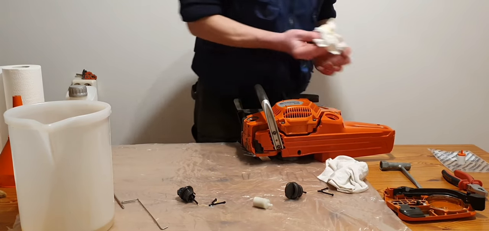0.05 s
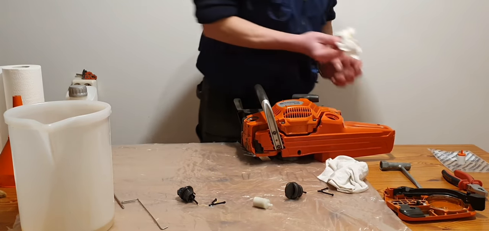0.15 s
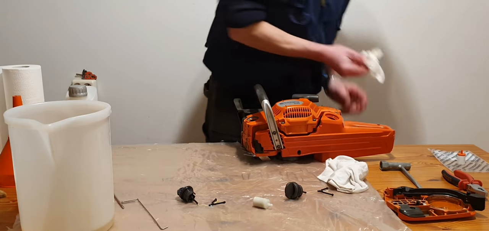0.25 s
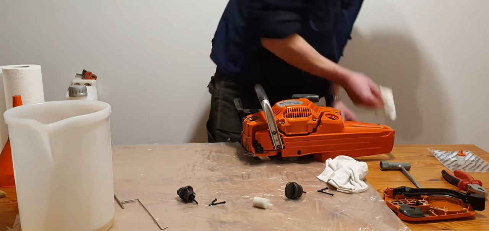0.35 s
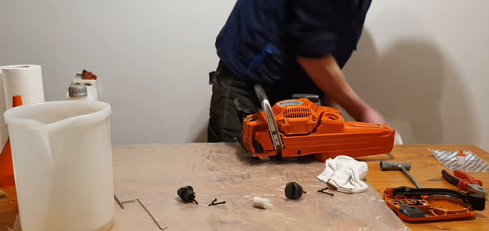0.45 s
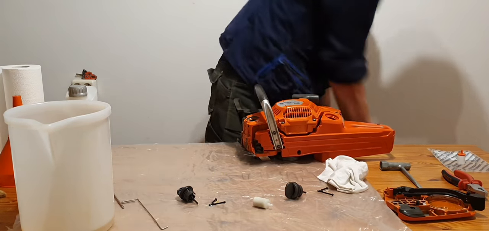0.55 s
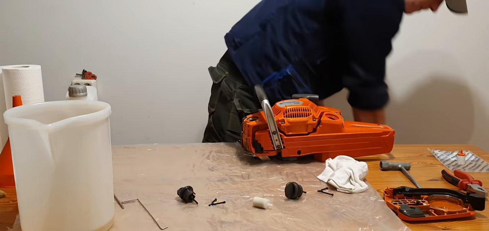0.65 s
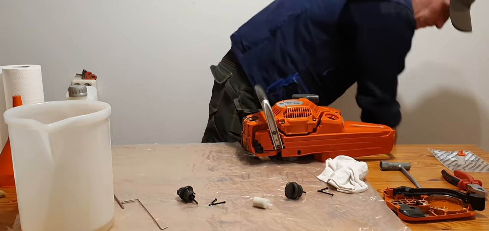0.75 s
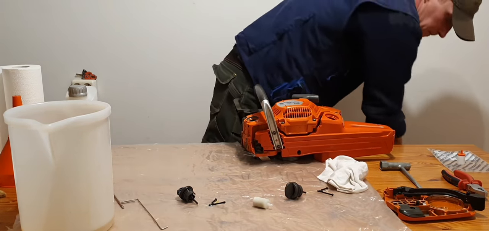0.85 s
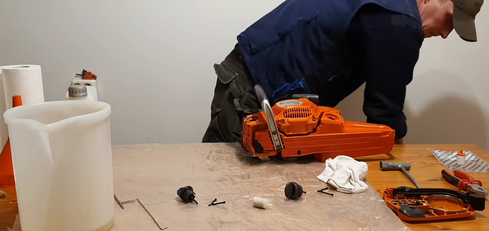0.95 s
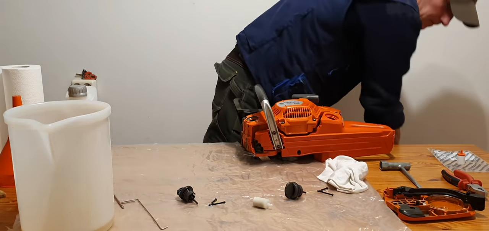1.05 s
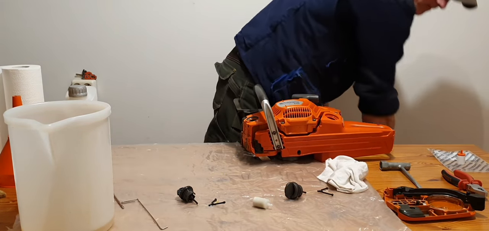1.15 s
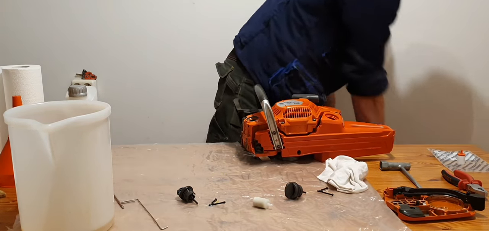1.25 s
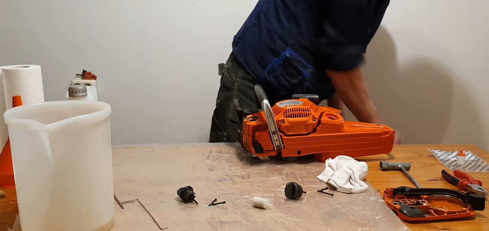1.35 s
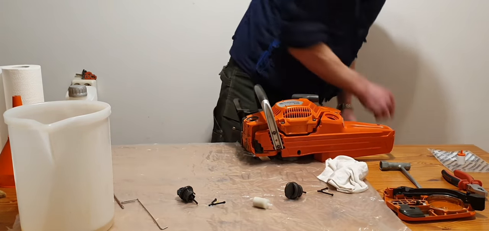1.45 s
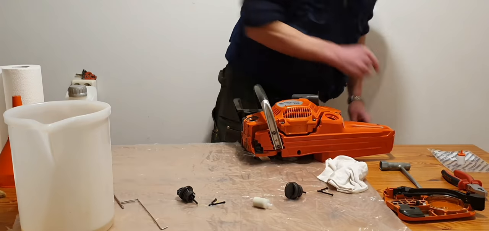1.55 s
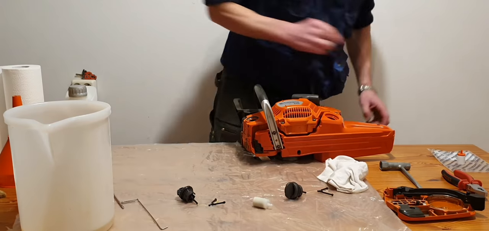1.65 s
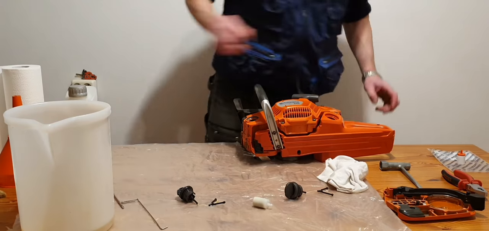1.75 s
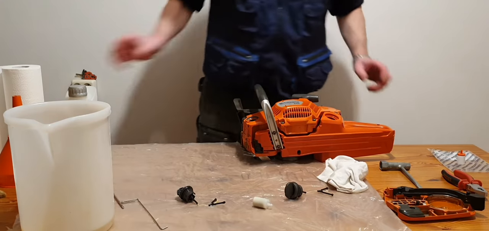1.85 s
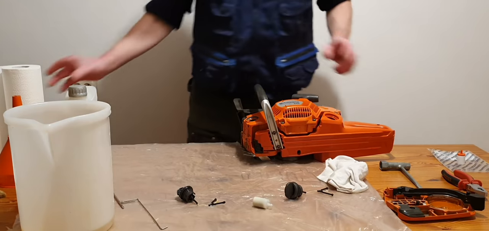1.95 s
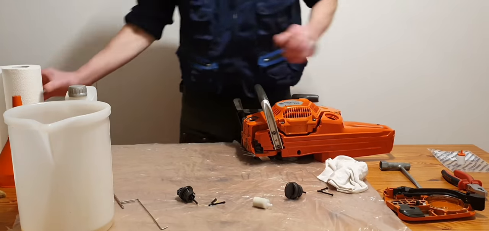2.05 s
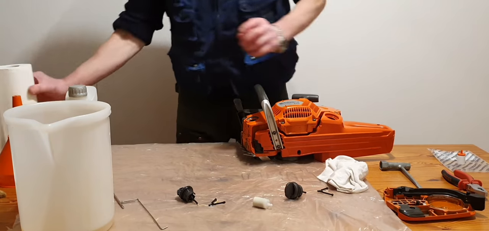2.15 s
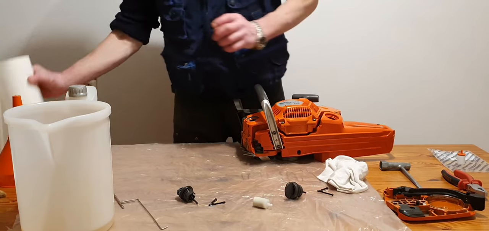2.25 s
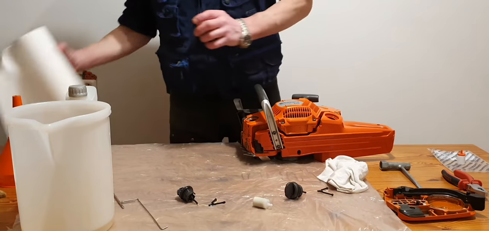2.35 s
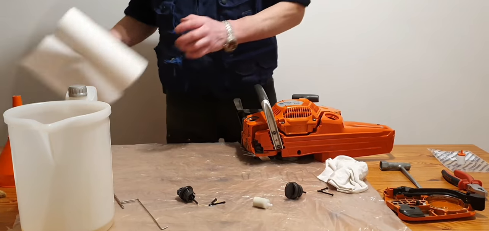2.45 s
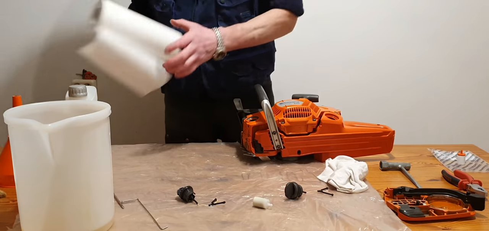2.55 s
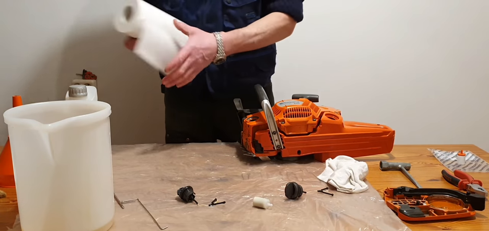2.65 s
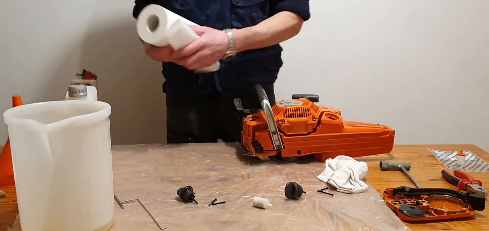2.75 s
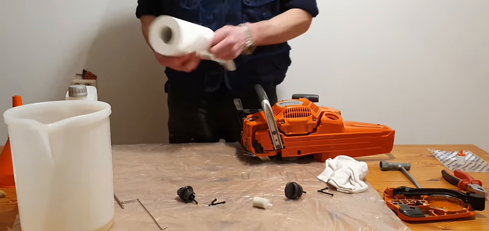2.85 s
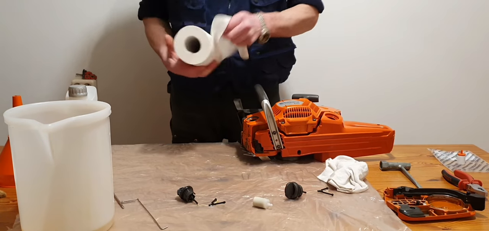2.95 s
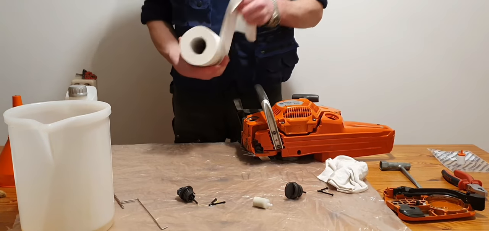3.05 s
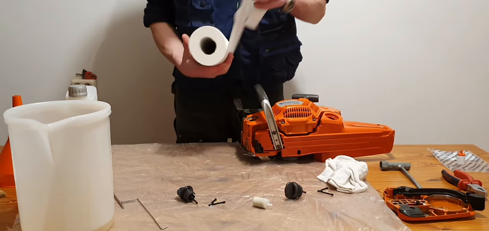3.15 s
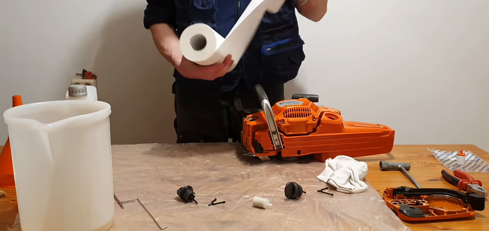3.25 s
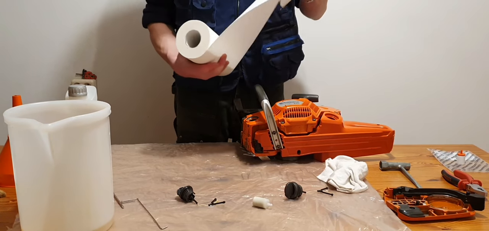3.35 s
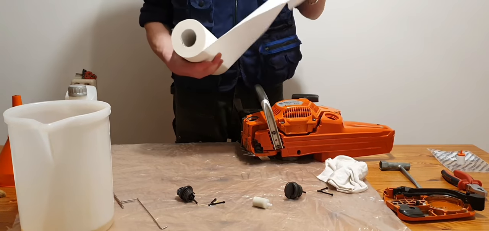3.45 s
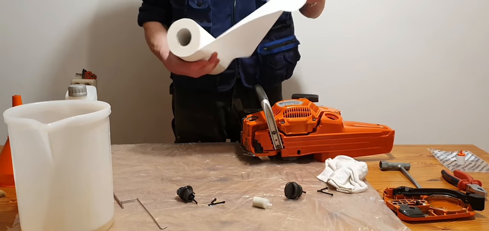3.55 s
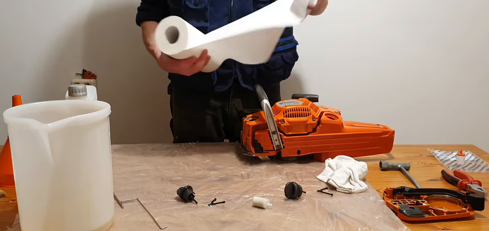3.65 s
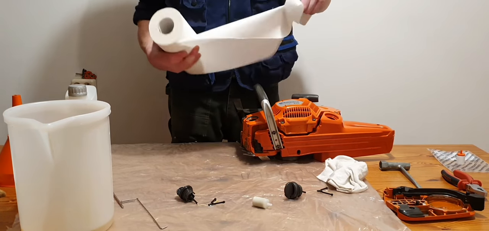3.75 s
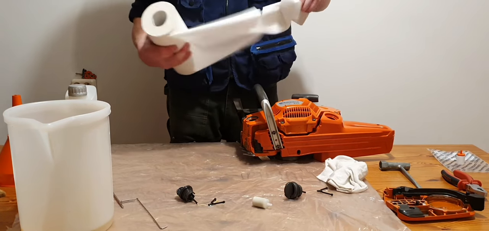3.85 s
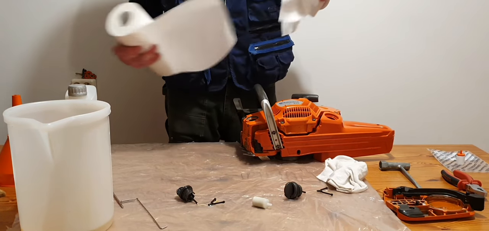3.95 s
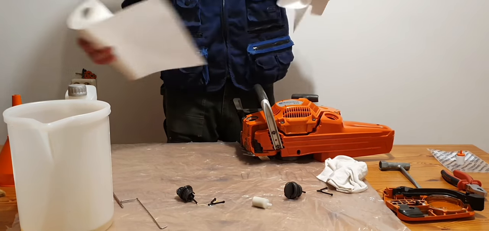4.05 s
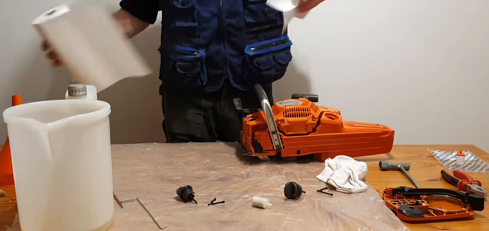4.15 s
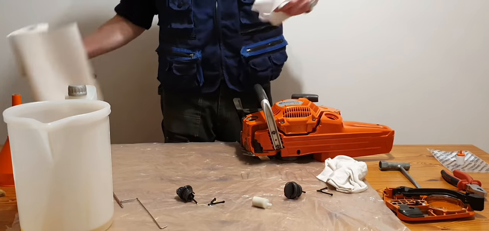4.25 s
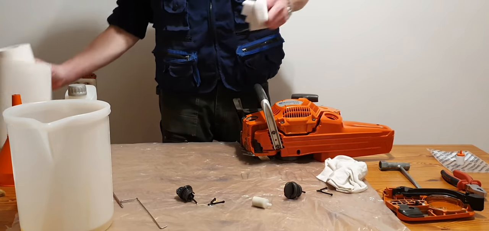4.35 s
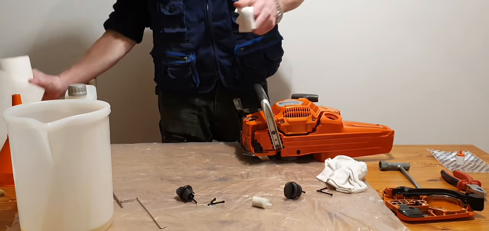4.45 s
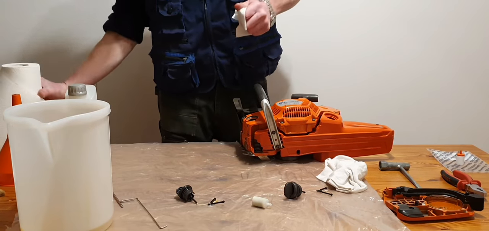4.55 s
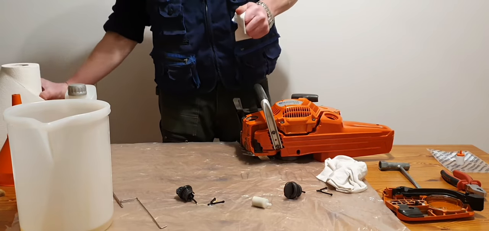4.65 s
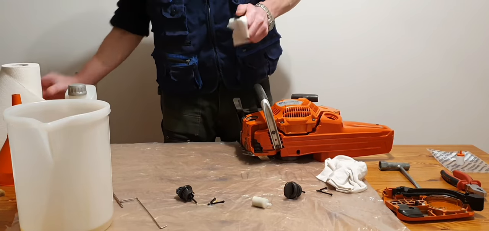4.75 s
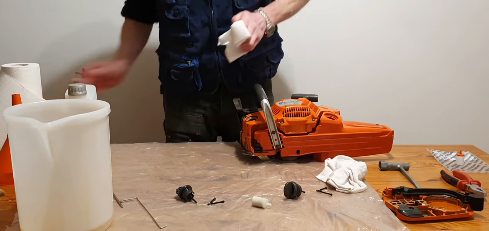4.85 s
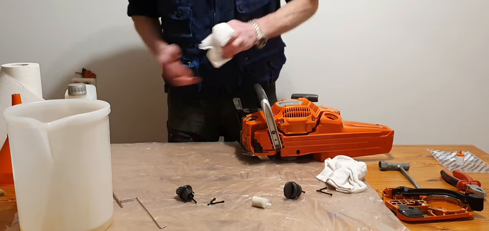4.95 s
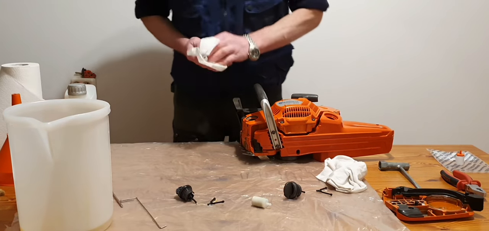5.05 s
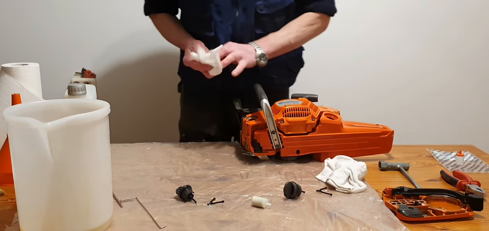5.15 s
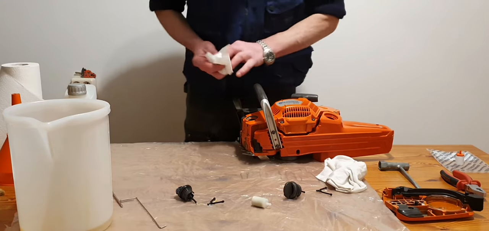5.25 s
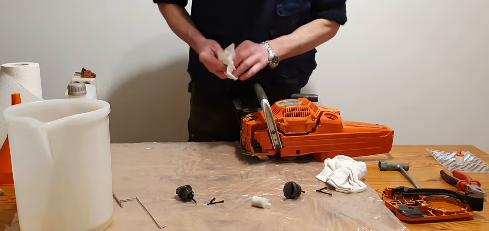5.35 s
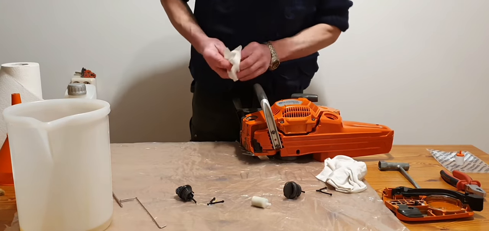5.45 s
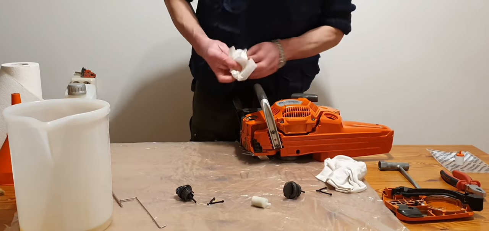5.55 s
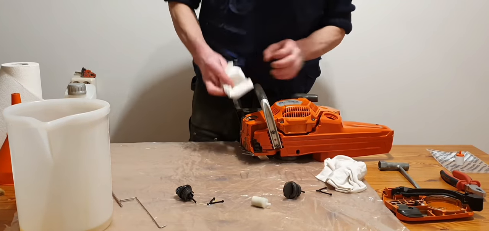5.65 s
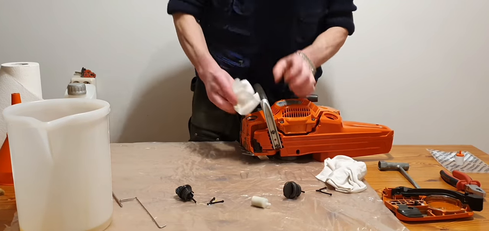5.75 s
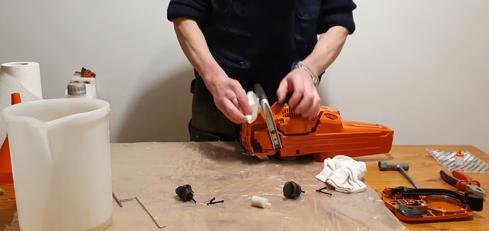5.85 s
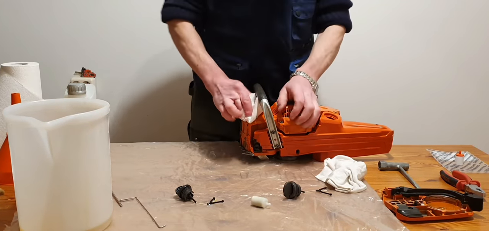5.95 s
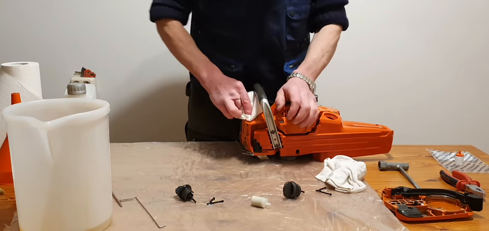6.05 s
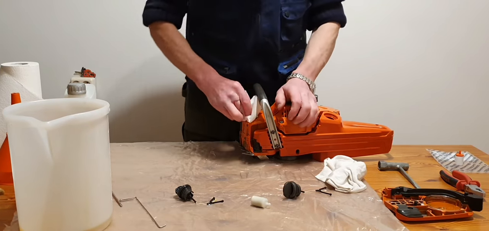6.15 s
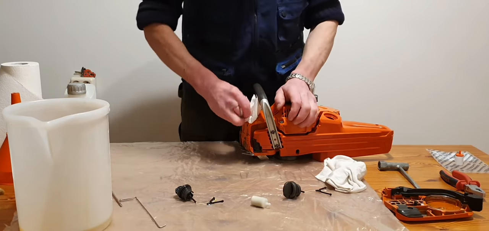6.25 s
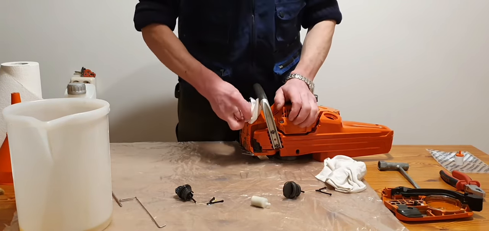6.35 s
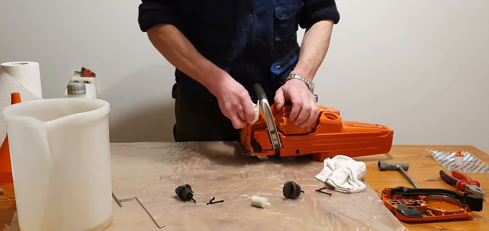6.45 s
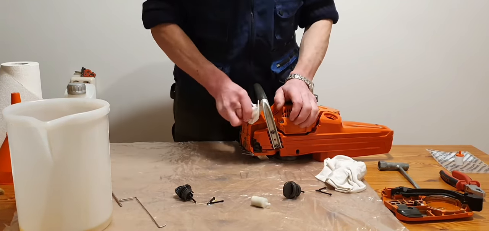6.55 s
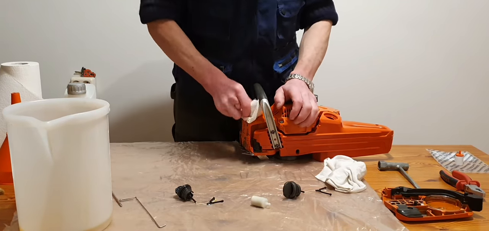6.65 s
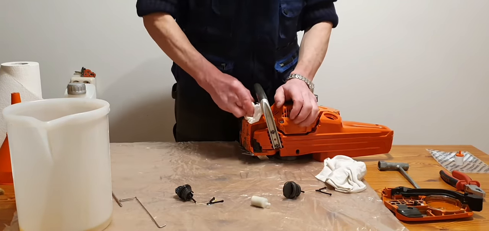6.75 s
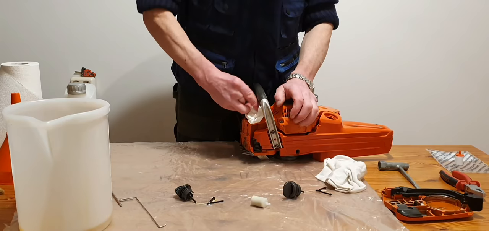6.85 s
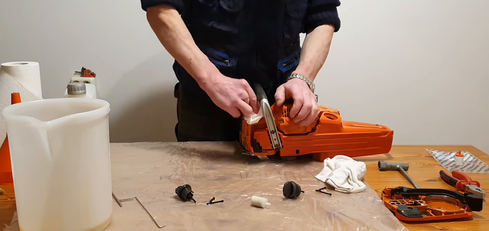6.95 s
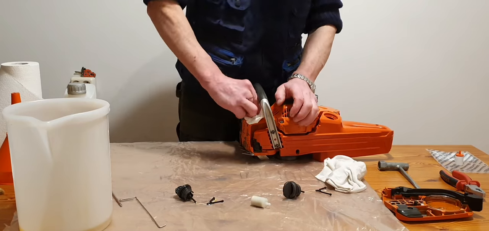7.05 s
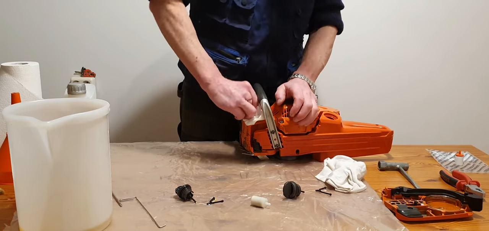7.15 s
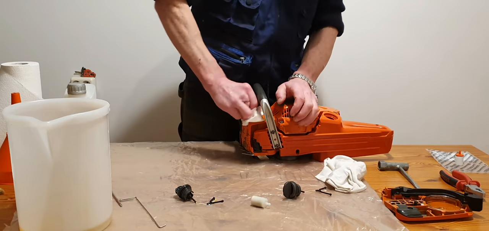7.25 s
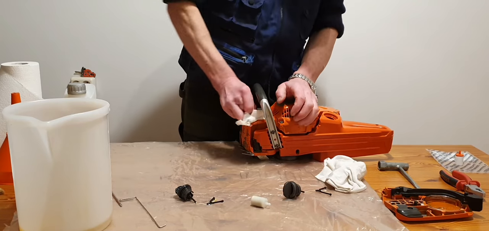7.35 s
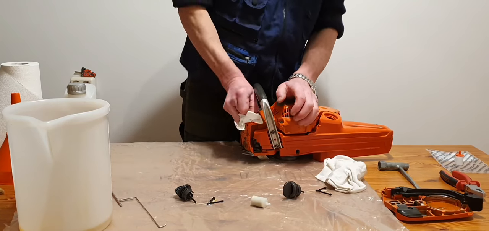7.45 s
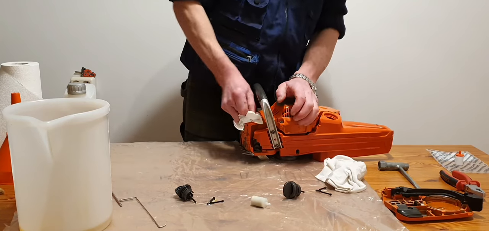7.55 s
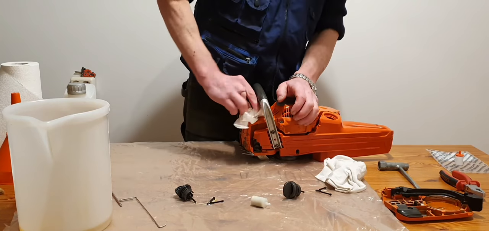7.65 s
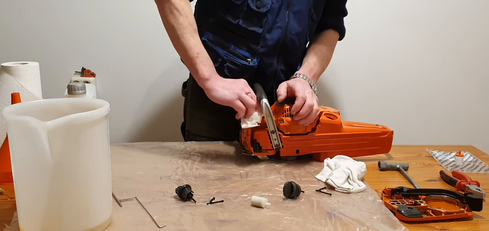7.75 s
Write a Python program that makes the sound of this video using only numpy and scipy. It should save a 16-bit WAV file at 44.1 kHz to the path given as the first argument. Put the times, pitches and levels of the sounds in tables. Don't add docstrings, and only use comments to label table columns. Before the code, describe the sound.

A small bare room with hard walls, echoes lasting about a third of a second, and faint low microphone hiss. From 0 to 2.2 s there is only quiet jacket rustling, soft low weight shifts and a very faint high nylon whistle around 1.1 to 1.6 s. At about 2.2 to 2.8 s a hollow paper roll is taken, with small knocks and growing papery crackle. From 2.8 to 3.7 s it is unrolled, swishing and creasing, with a faint hollow rub. At 3.79 s a sheet snaps off: an abrupt, bright rip of about a tenth of a second. Paper flutters until 4.49 s, when the roll lands with a deep, resonant table thump and small ticks. From 4.8 to 5.8 s the sheet is crumpled crisply, strongest near 5.13 s. Then soft dry wiping continues, with dull bumps near 7.3 s and light casing taps at 7.66 s. The right side is louder and brighter.

```python
import sys
import numpy as np
from scipy import signal
from scipy.fft import rfft, irfft, next_fast_len
from scipy.io import wavfile
from scipy.ndimage import uniform_filter1d

SR = 44100
rng = np.random.default_rng(int(sys.argv[2]) if len(sys.argv) > 2 else 0)


def attenuation_scalar(level_db):
    decades = np.asarray(level_db, float) / 20
    return 10 ** decades


def bounce(signal):
    frames = np.transpose(np.atleast_2d(signal))
    limited = np.clip(frames, -1, 1)
    pcm = np.round(limited * 32767).astype(np.int16)
    wavfile.write(sys.argv[1], SR, pcm)


N = 344421
FFT_SIZE = next_fast_len(N, True)
HZ, TIME = np.fft.rfftfreq(FFT_SIZE, 1 / SR), np.arange(N) / SR


def evened(x):
    return x / np.sqrt(np.mean(x ** 2) + 1e-20)


def read(points, hz):
    f, value = np.transpose(points)
    return np.interp(np.log(hz + 1), np.log(f + 1), value)


def filtered(x, gain):
    return irfft(rfft(x, FFT_SIZE) * gain, FFT_SIZE)[..., :N]


def coloured(x, points):
    hz = abs(np.fft.fftfreq(4096, 1 / SR))
    log_gain = np.log(attenuation_scalar(read(points, hz).clip(-100)))
    taps = np.fft.ifft(np.exp(signal.hilbert(log_gain).conj())).real
    return signal.oaconvolve(x, np.atleast_2d(taps[:2048]), axes=1)[:, :x.shape[1]]


def unit_colour(x, points):
    return coloured(x, points) / np.linalg.norm(coloured(signal.unit_impulse(2048)[None], points))


def placed(start_s, x):
    return np.pad(x, ((0, 0), (round(start_s * SR), N)))[:, :N]


def snaps(per_s, spread_db, hiss, count=N):
    size_db = spread_db * np.minimum(rng.exponential(1, count), 4)
    size = attenuation_scalar(size_db) * rng.choice([-1, 1], count)
    clicks = size * (rng.random(count) < per_s / SR)
    return evened(clicks) + hiss * rng.standard_normal(count)


def swells(rows, t):
    slope_db, rounded = 10, 1.75
    s, db, rise, fall = np.transpose(rows)[:4, :, None]
    away = np.maximum((s - t) / rise, (t - s) / fall)
    return attenuation_scalar(2 * (db - slope_db * away ** rounded).clip(-200))


def swell(rows):
    coarse = TIME[::64]
    return np.interp(TIME, coarse, np.sqrt(swells(rows, coarse).sum(0)))


# f/Hz, likeness [0..1]
LIKENESS = [(60, 0.66), (180, 0.78), (550, 0.44), (1650, 0.099), (4970, 0.082), (15000, 0.012)]


def paired(z, hz):
    same = np.clip(read(LIKENESS, hz), -1, 1)
    return np.array([z[0], same * z[0] + np.sqrt(1 - same ** 2) * z[1]])


def at_ports(a, b):
    spectra = rfft(np.array([a, b]), FFT_SIZE)
    return irfft(paired(spectra, HZ), FFT_SIZE)[:, :N]


# f/Hz, t60/s
WALLS_T60 = [(60, 0.23), (250, 0.31), (1000, 0.35), (4000, 0.35), (12000, 0.16)]


def room(x, wet_db, faster=1.0):
    taps = np.zeros((2, SR // 2 + 170))
    slots = np.arange(130, SR // 2, 20)
    at = slots + rng.integers(0, 20, (2, len(slots)))
    np.put_along_axis(taps, at, rng.choice([-1., 1.], at.shape), 1)
    hz, t, z = signal.stft(taps, SR, nperseg=512)
    decay = attenuation_scalar(-60 * faster * t / read(WALLS_T60, hz)[:, None])
    tail = signal.istft(paired(z, hz[:, None]) * decay, SR, nperseg=512)[1]
    tail *= attenuation_scalar(wet_db) / np.linalg.norm(tail, axis=1, keepdims=True)
    wet = signal.oaconvolve(x[None], tail, axes=1)[:, :len(x)]
    return (x + wet) / np.sqrt(1 + attenuation_scalar(2 * wet_db))


def scattered(power, faster=0.67):
    count = len(power)
    hz, t, z = signal.stft(rng.standard_normal((2, count)), SR, nperseg=256)
    frames = np.interp(t - .006, TIME[:count], uniform_filter1d(power, size=128))
    keep = attenuation_scalar(-120 * faster * t[1] / read(WALLS_T60, hz))
    stored = np.array([signal.lfilter([1 - k], [1, -k], frames) for k in keep])
    return signal.istft(paired(z, hz[:, None]) * np.sqrt(abs(stored)), SR, nperseg=256)[1][:, :count]


# t/s, effort/dB, rise/s, fall/s, weight/dB
JACKET_GESTURES = [(0.04, -71.5, 0.33, 0.078, -27), (0.2, -83, 0.31, 0.13, 16.5),
                   (0.34, -73, 0.04, 0.4, -40), (0.45, -94, 0.18, 0.19, 31), (0.62, -74, 0.42, 0.25, -31),
                   (0.73, -65, 0.077, 0.13, -13), (0.859, -65.5, 0.17, 0.059, 11.5),
                   (1.03, -67, 0.14, 0.11, 9), (1.25, -80, 0.099, 0.17, -11), (1.47, -94.5, 0.13, 0.22, 33),
                   (1.55, -89, .08, 0.086, 26), (1.65, -79.5, 0.26, 0.14, -20),
                   (1.85, -81, 0.073, 0.11, -7), (2.0, -69.5, 0.051, 0.17, -17),
                   (2.11, -66, 0.049, 0.19, -4), (2.17, -70.5, 0.063, 0.11, 9.5),
                   (2.38, -67.5, 0.16, 0.16, -5), (4.09, -61.5, 0.069, 0.095, -12),
                   (4.71, -61.5, 0.059, 0.24, 6), (5.55, -71, 0.16, 0.4, -11)]
ROLL_GESTURES = [(2.372, -67, 0.061, 0.13, 15.5), (2.49, -58.5, 0.083, 0.082, -7),
                 (2.57, -68, 0.051, 0.053, 13.5), (2.65, -70.5, 0.075, .05, 3),
                 (2.72, -63, 0.045, 0.082, 9), (2.775, -59.5, 0.042, 0.088, 4),
                 (2.836, -48, 0.045, 0.066, 2.5), (2.97, -51.5, 0.12, 0.075, 6.5),
                 (3.05, -54, 0.05, 0.058, 2.5), (3.13, -55.5, 0.096, 0.1, 0.5),
                 (3.27, -51.5, 0.1, 0.42, -4), (3.36, -56.5, 0.075, 0.51, 6), (3.455, -53, .08, 0.039, -3),
                 (3.52, -77, .04, 0.03, -12), (3.665, -61, 0.045, 0.1, -5), (3.72, -59.5, 0.1, 0.063, 13.5),
                 (3.76, -63, 0.028, 0.038, -40), (4.059, -60.5, 0.43, 0.16, -12),
                 (4.19, -50.5, 0.14, 0.16, -1.5), (4.358, -53, 0.16, 0.045, -7.5),
                 (4.46, -53, 0.063, 0.31, -8), (4.5, -54, 0.021, 0.095, 15.5),
                 (4.59, -66, 0.058, 0.056, 16)]
SHEET_GESTURES = [(4.8, -66.5, 0.046, 0.055, -4), (4.92, -60, 0.057, 0.055, -15),
                  (5.0, -55.5, 0.022, 0.06, 9), (5.08, -51, 0.099, 0.038, -3),
                  (5.128, -47.5, 0.049, 0.037, -6), (5.17, -47.5, 0.035, 0.043, -3.5),
                  (5.215, -56.5, 0.033, 0.023, -4), (5.3, -54.5, 0.31, 0.087, -2),
                  (5.39, -57.5, 0.05, 0.056, -3), (5.53, -54, 0.069, 0.092, -9),
                  (5.69, -55, 0.09, 0.096, -5.5), (5.83, -51.5, 0.032, 0.1, -24),
                  (5.87, -59, 0.11, 0.036, 13.5), (5.97, -56, 0.072, 0.19, 2), (6.14, -62, 0.03, 0.054, -7),
                  (6.18, -64, 0.23, 0.12, 12), (6.28, -59, 0.075, 0.066, -38),
                  (6.39, -59, 0.056, 0.089, 1.5), (6.54, -57.5, 0.13, 0.06, -17),
                  (6.62, -55.5, 0.042, 0.19, -3), (6.79, -57, 0.061, 0.091, 2),
                  (6.895, -54.5, 0.033, 0.062, 4.5), (7.02, -66.5, 0.095, 0.07, 3),
                  (7.11, -60.5, 0.043, 0.12, -0.5), (7.2, -62.5, 0.033, 0.25, 0),
                  (7.341, -59, 0.1, 0.075, 9.5), (7.58, -59.5, 0.081, 0.098, 1.5),
                  (7.665, -62.5, 0.085, 0.067, 16), (7.78, -61, 0.12, .2, 3)]
SKID_GESTURES = [(2.83, -58.5, .03, 0.06, 0), (2.93, -64.5, .05, 0.11, 0), (3.625, -65, .03, 0.044, 0),
                 (4.33, -66, 0.042, .04, -10), (4.41, -67, 0.042, .04, 5), (5.13, -62, .04, .04, 4),
                 (5.535, -62, 0.041, 0.034, 5), (5.69, -64.5, 0.042, 0.052, 1),
                 (5.82, -62.5, 0.029, .04, 0), (6.53, -71, .04, .04, 0), (7.55, -77, .04, .05, 3)]
# body/dB, fold/dB, middle/dB, sheen/dB
REGION_LEVELS_DB = [(-9, -7.5, -0.3, -1), (-7.5, -4.5, -0.5, -8.5), (-14.5, -5.5, 0, -9.5),
                    (-30, -20, -4, 5)]
# body [dB/dB], fold [dB/dB], middle [dB/dB], sheen [dB/dB]
REGION_DB_PER_WEIGHT_DB = [(1, 0.42, 0.02, -0.31), (1, 0.4, 0.085, -0.37), (1, 0.25, 0.0043, 0.11),
                           (1, 1, 1, 0)]


def grips(t):
    power = 0
    gestures = JACKET_GESTURES, ROLL_GESTURES, SHEET_GESTURES, SKID_GESTURES
    for rows, base_db, law in zip(gestures, REGION_LEVELS_DB, REGION_DB_PER_WEIGHT_DB):
        weight_db = np.transpose(rows)[-1]
        colour_db = np.array(base_db)[:, None] + np.outer(law, weight_db)
        power = power + attenuation_scalar(2 * colour_db) @ swells(rows, t)
    return np.sqrt(power)


# f/Hz, level/dB (per Hz)
CLOTH_TONE = [(120, -28), (200, -10.5), (334, -13.5), (439, -3.5), (557, -7.5), (803, 1.5), (1440, -3),
              (3590, -9.5), (9820, -19.5), (15800, -33)]
ROLL_TONE = [(120, -25.5), (200, -11.5), (305, -21), (353, -10), (401, -10), (644, -11), (863, -5.5),
             (999, -7.5), (1120, -9.5), (1670, -6), (1830, -6.5), (3660, -8.5), (11400, -21), (15800, -36)]
SHEET_TONE = [(120, -20), (200, -9.5), (310, 0), (346, -9), (386, 0.5), (644, -7), (719, -5), (1390, -7.5),
              (1640, -4), (2940, -1.5), (9470, -1.5), (15800, -14.5)]
ROLL_TAKEN_S, ROLL_RELEASED_S = 2.3, 4.6


def gripped(x):
    hz, t, z = signal.stft(x, SR, nperseg=512)
    grip = grips(t)
    a, b, c = (1 / (1 + (hz / edge_hz) ** 4) for edge_hz in (650, 1600, 5000))
    split = np.array([a, b - a, c - b, 1 - c])
    taken, released = (np.clip((t - s) / 0.043, 0, 1) for s in (ROLL_TAKEN_S, ROLL_RELEASED_S))
    gain = 0
    for share, tone in ((1 - taken, CLOTH_TONE), (taken - released, ROLL_TONE), (released, SHEET_TONE)):
        regions = attenuation_scalar(read(tone, hz)) * split
        regions = regions / np.sqrt(np.mean(regions ** 2, 1, keepdims=True))
        gain = gain + share * (regions.T @ grip)
    return signal.istft(z * gain, SR, nperseg=512)[1][:, :N]


def hands():
    clumps = attenuation_scalar(1.2 * evened(uniform_filter1d(rng.standard_normal(N), 300)))
    near = clumps * snaps(2500, 3.2, 0.82)
    heard = room(near, 10.4, faster=3.1) + attenuation_scalar(3.0) * scattered(near ** 2, faster=1.0)
    on_jacket = np.clip((ROLL_TAKEN_S - TIME) / 0.19, 0, 1)
    lean_db = np.outer([-1, 1], on_jacket)
    return attenuation_scalar(-2.0 + lean_db) * gripped(evened(heard))


# t/s, level/dB, rise/s, fall/s
WEIGHT_SHIFTS = [(.1, -80, .08, 0.14), (.35, -60, 0.027, .06), (.46, -61, 0.099, 0.17), (.85, -68, .2, 0.1),
                 (1.35, -83, .03, 0.15), (1.5, -62, 0.11, 0.022), (1.66, -78, 0.12, 0.036),
                 (1.85, -71, .02, .15), (1.98, -77, .1, 0.043), (2.2, -73, 0.15, .2),
                 (2.47, -65, 0.16, .05), (2.53, -55.5, 0.047, 0.13), (2.84, -50.5, 0.022, 0.16),
                 (3.45, -62.5, 0.064, 0.043), (3.72, -58.5, 0.0835, .04), (4.14, -67.5, 0.018, 0.14),
                 (5.02, -57.5, 0.13, 0.13), (5.15, -63, 0.047, .07), (5.45, -72, 0.63, 0.17),
                 (5.7, -74, 0.027, 0.11), (5.86, -57.5, 0.037, 0.1), (6.0, -64.5, .08, 0.14),
                 (6.38, -65.5, 0.023, 0.14), (6.9, -65.5, 0.1, 0.08), (7.13, -71, 0.17, 0.099),
                 (7.28, -60, 0.024, 0.11), (7.36, -54.5, 0.094, 0.091), (7.54, -60, 0.036, 0.11)]
# f/Hz, level/dB (per Hz)
RUMBLE_TONE = [(15, -59), (25, -9), (70, 5.5), (87, 10), (113, -3), (193, 6.5), (306, -9.5), (352, -4),
               (400, -49), (520, -40), (880, -120)]


def shifting():
    lumps = at_ports(snaps(150, 4.4, 0.79), snaps(170, 0.87, 1.0))
    return attenuation_scalar(-6.5) * swell(WEIGHT_SHIFTS) * evened(coloured(lumps, RUMBLE_TONE))


def struck(rows, wet_db):
    out, t = np.zeros(N + SR), TIME[:SR // 2]
    for s, db, hz, t60 in rows:
        mode = 1.14 * np.sin(2 * np.pi * hz * t)
        onset = 1 - np.exp(-4 * hz * t)
        out[round(s * SR):][:len(t)] += attenuation_scalar(db - 60 * t / t60) * mode * onset
    return room(out[:N], wet_db)


# t/s, peak/dB, f/Hz, t60/s
HOLLOW_KNOCKS = [(0.449, -57, 79, 0.13), (.42, -59, 253, .08), (1.45, -59, 190, 0.16),
                 (2.189, -49, 64.3, 0.069), (2.373, -68, 353, 0.069), (2.522, -48.5, 177, 0.11),
                 (2.548, -43, 206, 0.025), (2.822, -36.5, 354.5, 0.091), (4.992, -44.5, 445, 0.043),
                 (5.665, -54, 505, 0.056), (5.688, -47.5, 450, 0.043), (5.71, -50, 515, .04),
                 (5.813, -44, 390, 0.098), (5.834, -49, 365, .04), (5.858, -45.5, 410, .06),
                 (6.335, -49, 271, 0.04), (7.279, -40, 77, 0.068), (7.275, -53, 199, .05),
                 (7.31, -47.5, 194, 0.092), (7.335, -49, 282, 0.067), (7.325, -44, 73, 0.2),
                 (7.385, -46.5, 76, 0.17), (7.51, -55.5, 80, 0.18)]


def knocks():
    return struck(HOLLOW_KNOCKS, -0.63)


# t/s, peak/dB, f/Hz, t60/s
SNAPPED_CREASES = [(0.6955, -44, 3460, 0.0075), (2.1776, -52, 3230, 0.008), (2.8044, -36, 1650, 0.014),
                   (2.9505, -35, 1630, 0.007), (3.2485, -37, 2440, 0.0095), (3.3225, -36, 2930, 0.0081),
                   (3.6625, -37.5, 1640, 0.0092), (4.18, -37, 3000, .008), (4.701, -42, 4936, 0.0043),
                   (5.1295, -30.5, 2460, 0.0064), (5.146, -47, 2260, 0.009), (5.1618, -36, 3420, 0.006),
                   (5.795, -47, 2950, 0.0073), (2.7158, -46, 1510, .008), (3.749, -43, 3000, .006),
                   (4.9976, -43, 2030, .008), (5.29, -48, 3000, .006), (5.6287, -46, 2590, .007),
                   (6.007, -39, 3020, 0.0046), (6.918, -42, 3000, .006), (7.3075, -44, 1500, .008),
                   (7.62, -45, 3220, .006)]


def creases():
    return struck(SNAPPED_CREASES, -3)


# t/s, level/dB, rise/s, fall/s
NYLON_SLIDES = [
    (1.12, -81.5, .04, 0.23),
    (1.54, -83, .03, 0.072),
    (1.604, -88, .03, 0.048),
]


def whistle():
    centre_hz, width_hz = 4430, 110
    resonance = 1 / (1 + ((HZ - centre_hz) / width_hz) ** 2)
    narrow = filtered(rng.standard_normal((2, N)), resonance)
    return attenuation_scalar(0.5) * swell(NYLON_SLIDES) * evened(narrow)


def rub():
    start_s, end_s, low_hz, high_hz, level_db = 3, 7.66, 242, 458, -59
    count = SR // 2
    along = np.clip(TIME[:count] / (end_s - start_s), 0, 1)
    turn = np.exp(2j * np.pi * np.cumsum(low_hz + (high_hz - low_hz) * along) / SR)
    noise = [1, 1j] @ rng.standard_normal((2, count))
    slips = signal.lfilter(*signal.butter(2, 45, fs=SR), noise)
    pressure = np.sqrt(np.sin(np.pi * along ** 1.8).clip(0))
    return placed(start_s, room(attenuation_scalar(level_db) * evened((turn * slips).real) * pressure, 1.5))


# t/s, force/dB, flap/dB (re force)
TEAR = [
    (3.7868, -60, -11),
    (3.7873, -20.5, -2),
    (3.792, -28.5, 7.5),
    (3.805, -27.5, -9),
    (3.818, -26.5, 3.5),
    (3.83, -39, 10),
    (3.85, -32.5, 3.5),
    (3.87, -42.5, 7),
    (3.9, -77, 7.5),
]
# f/Hz, level/dB (per Hz)
TEAR_TONE = [(29, 2), (50, -21.5), (155, -6.5), (397, -7), (470, -3.5), (597, -9.5), (779, -6.5),
             (1350, -5), (1600, -1), (1720, -4), (2040, -3), (3720, -8), (9000, -24), (13000, -32),
             (15800, -46)]


def rip():
    start_s, t = TEAR[0][0], TIME[:SR]
    clock = TIME[round(start_s * SR):][:SR]
    at_s, *levels_db = np.transpose(TEAR)
    force_db, flap_db = (np.interp(clock, at_s, db) for db in levels_db)
    near = attenuation_scalar(force_db) * (t < .11) * snaps(3500, 0.88, 0.9, count=SR)
    near[12] += attenuation_scalar(-11.0)
    heard = attenuation_scalar(-2.0) * room(near, 2.9) + attenuation_scalar(-4.0) * scattered(near ** 2)
    dull = signal.lfilter(*signal.butter(2, 1100, fs=SR), heard)
    bite = signal.lfilter(*signal.butter(2, 4500, "highpass", fs=SR), heard)
    bite *= 0.13 * np.exp(-t / 0.0085)
    torn = heard + bite + (attenuation_scalar(flap_db) - 1) * dull
    return placed(start_s, unit_colour(torn, TEAR_TONE) * attenuation_scalar([[.4], [-.4]]))


# t/s, blow/dB, contact/s
ROLL_BLOWS = [
    (4.487, -30.4, .0019),
    (4.4953, -33.4, .0012),
    (4.501, -16, .009),
    (4.5117, -15, .009),
    (4.5213, -24.6, .0012),
    (4.5462, -23.2, .0089),
    (4.5821, -45.3, .0012),
]
# f/Hz, level/dB, t60/s
TOP_MODES = [(58.7, 1, .18), (85.7, -4.2, .47), (113.8, -4.7, .35), (139.4, 8.7, .48), (194.3, -18.3, .44),
             (290, -6, .25), (340, -7, .15), (460, -3, .24), (506, -4, .21), (610, 2, .19), (764, -16, .16)]
# f/Hz, level/dB, t60/s
FRAME_MODES = [(58.2, -13, .46), (66.4, -15.1, .43), (90, -13.4, .58), (117.8, -11.3, .55),
               (211.7, -19.9, .7), (246, -14, .45), (362, -12, .3), (431, -10, .3), (560, -10, .3),
               (630, -4, .2)]
# f/Hz, level/dB (per Hz)
BOOM_TONE = [(130, -41.5), (220, 1), (296, 5.5), (387, -4.5), (434, 2), (561, -14), (608, -9.5), (687, -14),
             (1100, -19), (1430, -48), (2420, -120)]


def landing():
    start_s, t = ROLL_BLOWS[0][0], TIME[:SR]
    push = np.zeros(SR)
    for s, db, contact_s in ROLL_BLOWS:
        phase = np.clip((t + start_s - s) / contact_s, 0, 1)
        push -= attenuation_scalar(db) / contact_s / SR * np.sin(np.pi * phase)
    modes = TOP_MODES + FRAME_MODES
    ring = sum(attenuation_scalar(db - 60 * t / t60) * np.sin(2 * np.pi * hz * t) for hz, db, t60 in modes)
    table = signal.fftconvolve(push, ring)[:SR]
    early = table ** 2 * (t > .02) * (t < .1)
    return placed(start_s, room(table, -19) + attenuation_scalar(-15) * unit_colour(scattered(early), BOOM_TONE))


# t/s, peak/dB, f/Hz, t60/s
CASING_TAPS = [
    (7.656, -37.5, 690, 0.017),
    (7.67, -40.5, 662, 0.031),
    (7.691, -54, 738, 0.025),
]


def taps():
    return struck(CASING_TAPS, -1.4)


def scene():
    handling = hands() + shifting() + knocks() + creases() + whistle() + rub()
    return handling + rip() + landing() + taps()


def top_cut(x):
    return signal.sosfilt(signal.butter(12, 16470, fs=SR, output="sos"), x)


# f/Hz, left minus right/dB
PORT_TILT = [(61, -2.4), (111, -2.4), (201, -3.1), (381, -5.2), (701, -6.9), (1291, -7.2), (2381, -6.4),
             (4401, -6.8), (8121, -6.1), (11001, -7.1), (15001, -16.5)]
# f/Hz, level/dB (per Hz)
HISS_TONE = [(18, -34), (30, -4), (77, -0.5), (264, -8.5), (318, -8.5), (459, -6.5), (2100, -27),
             (5540, -27), (15800, -42)]


def record(dry):
    hiss = attenuation_scalar(-80) * evened(coloured(at_ports(*rng.standard_normal((2, N))), HISS_TONE))
    roll_off = signal.butter(6, 48, "highpass", fs=SR, output="sos")
    capsule = signal.sosfilt(roll_off, dry) + hiss
    tilt_db = read(PORT_TILT, HZ) / 2
    dip_hz, dip_width_hz, dip_db = 1003, 53, -4
    notch_db = dip_db / (1 + ((HZ - dip_hz) / dip_width_hz) ** 2)
    gain = (HZ < 15720) * attenuation_scalar(np.array([tilt_db, -tilt_db]) + notch_db)
    return top_cut(filtered(capsule, gain))


dry = scene()
out = record(dry)
bounce(out)
```